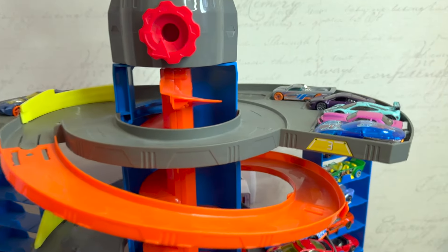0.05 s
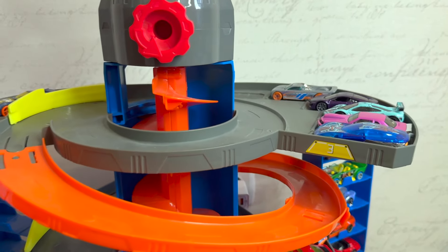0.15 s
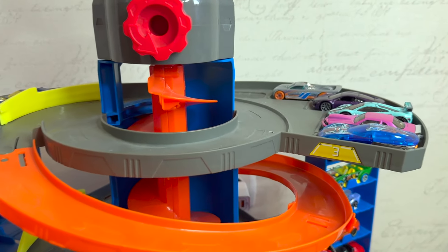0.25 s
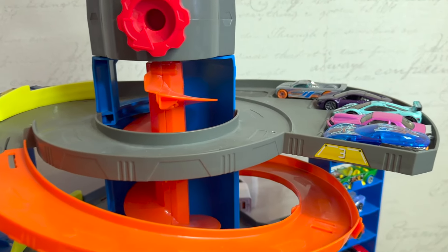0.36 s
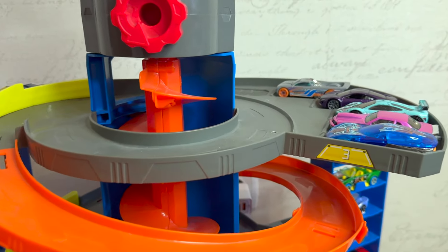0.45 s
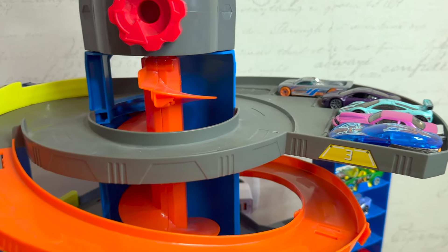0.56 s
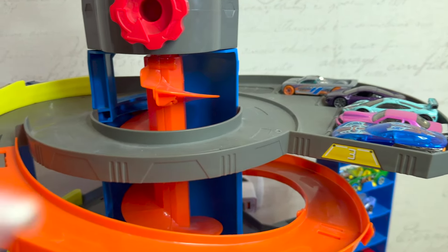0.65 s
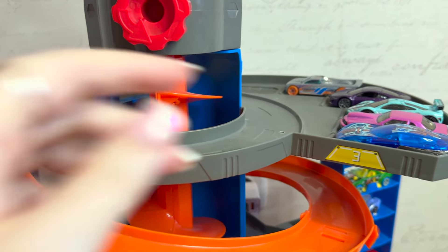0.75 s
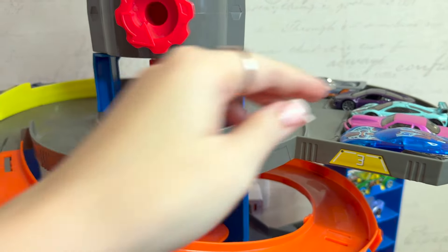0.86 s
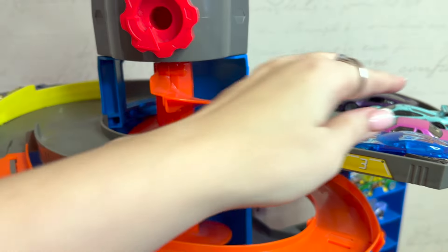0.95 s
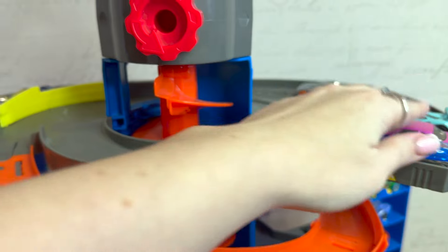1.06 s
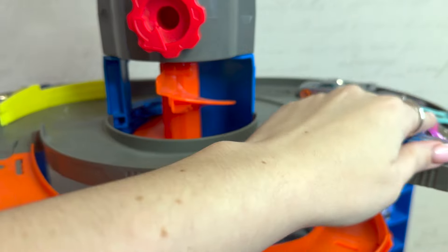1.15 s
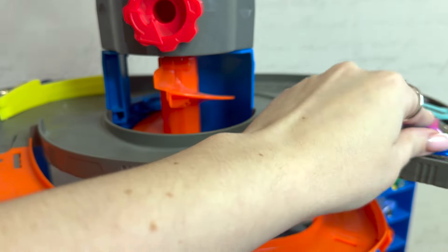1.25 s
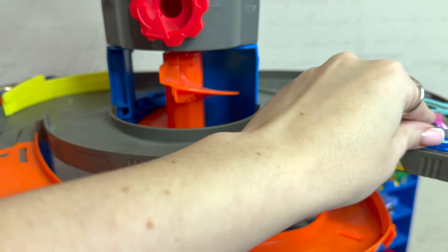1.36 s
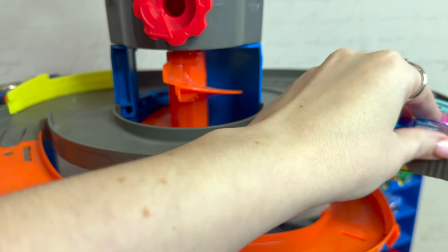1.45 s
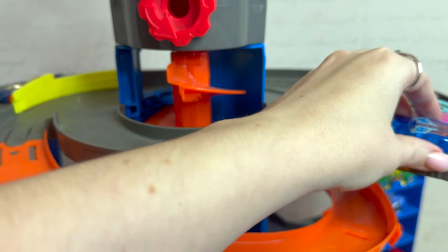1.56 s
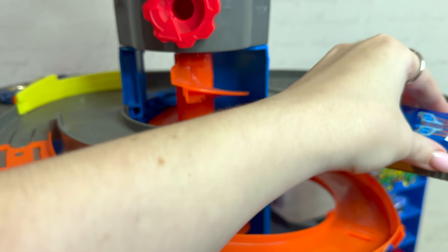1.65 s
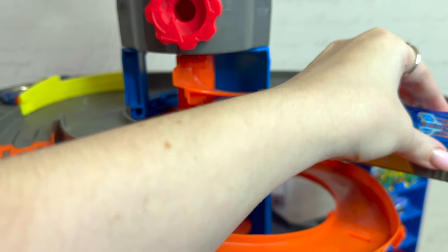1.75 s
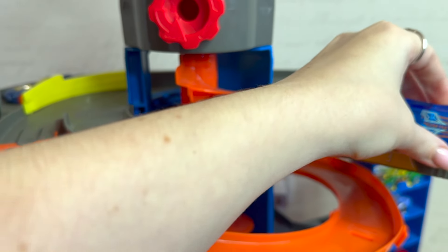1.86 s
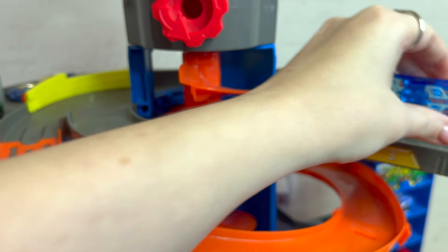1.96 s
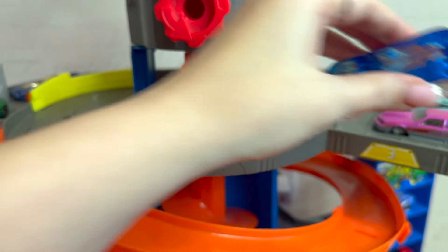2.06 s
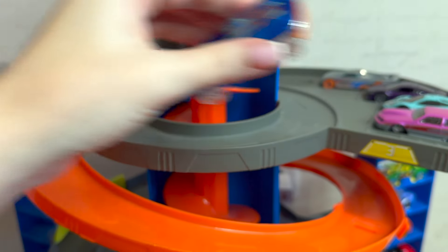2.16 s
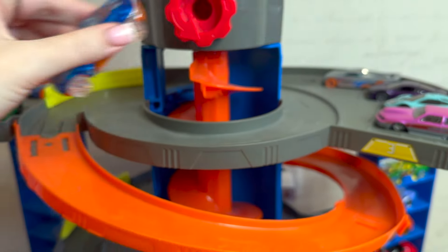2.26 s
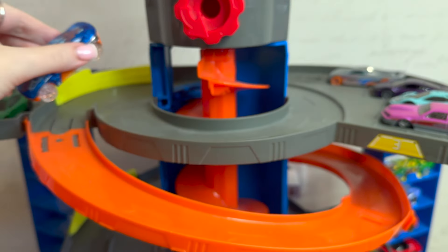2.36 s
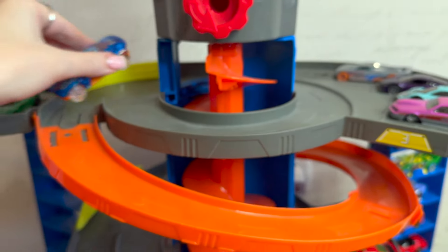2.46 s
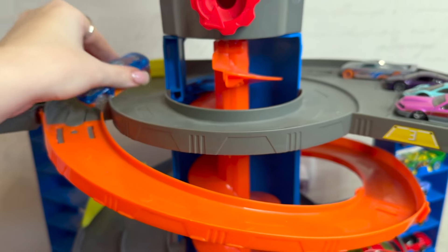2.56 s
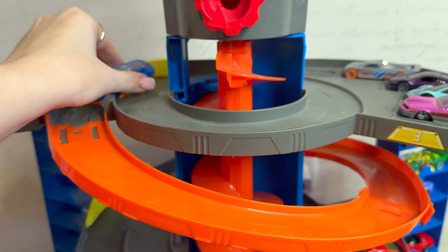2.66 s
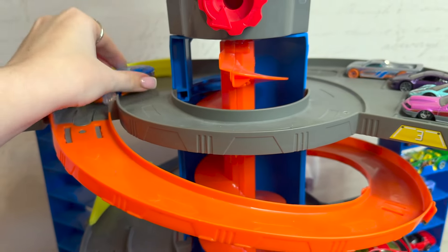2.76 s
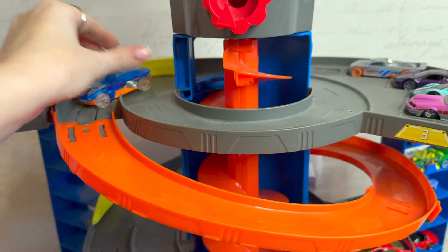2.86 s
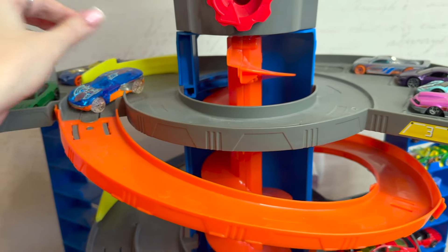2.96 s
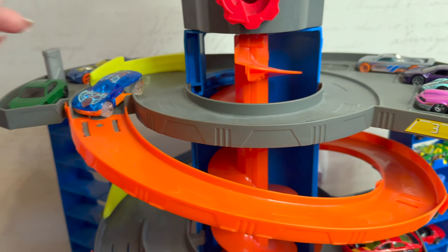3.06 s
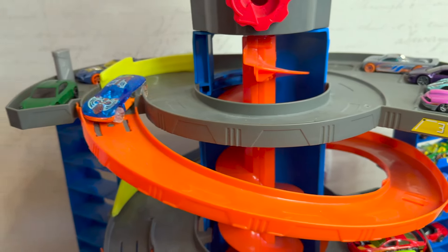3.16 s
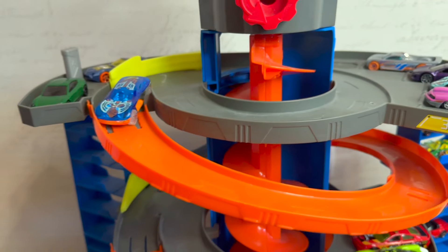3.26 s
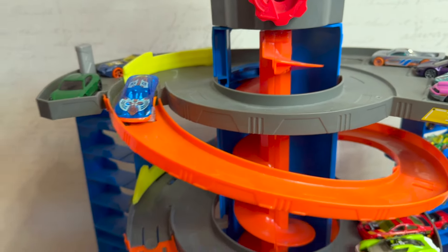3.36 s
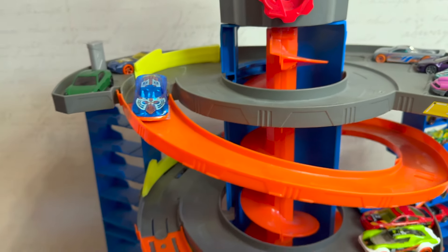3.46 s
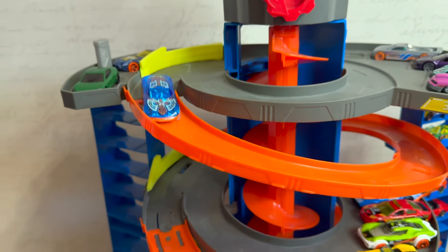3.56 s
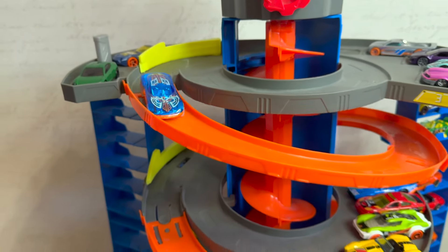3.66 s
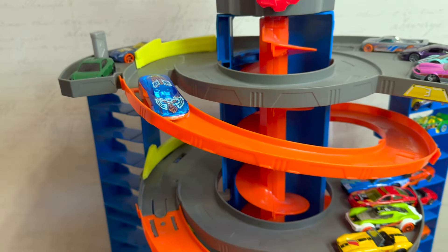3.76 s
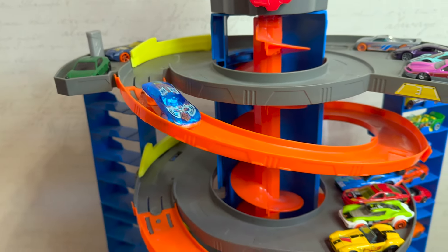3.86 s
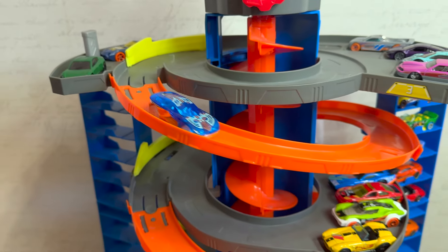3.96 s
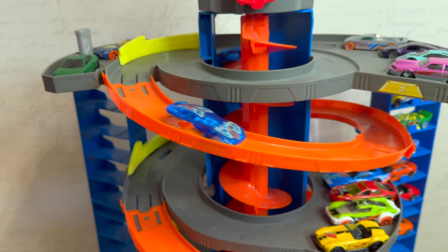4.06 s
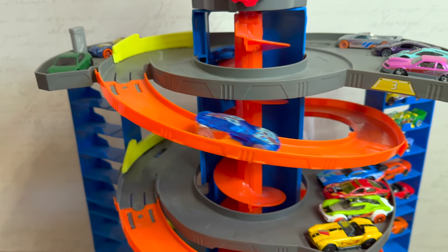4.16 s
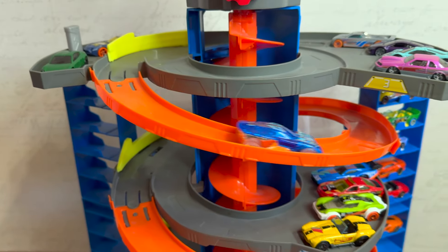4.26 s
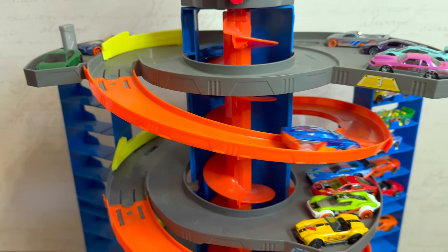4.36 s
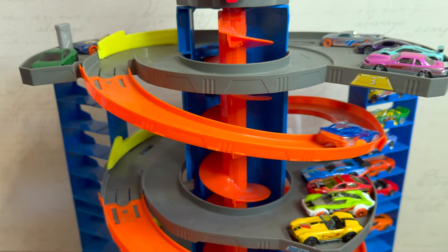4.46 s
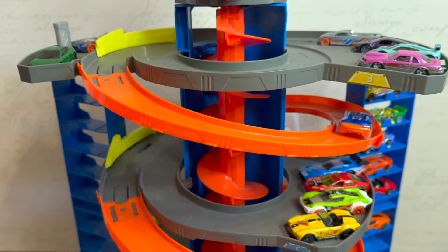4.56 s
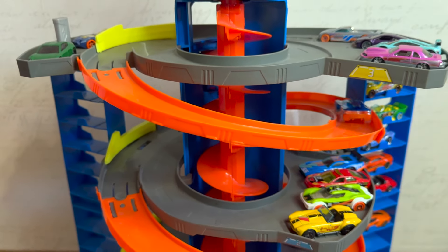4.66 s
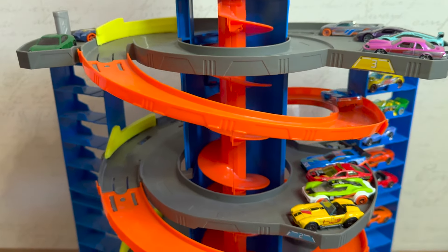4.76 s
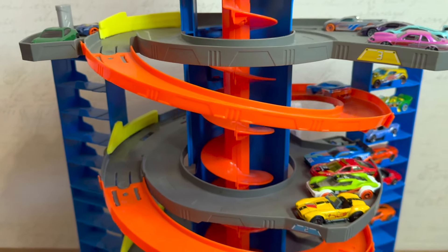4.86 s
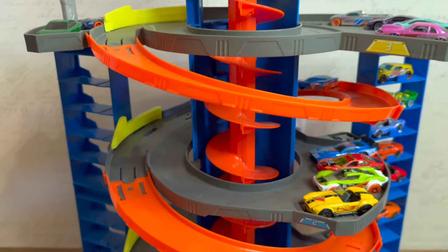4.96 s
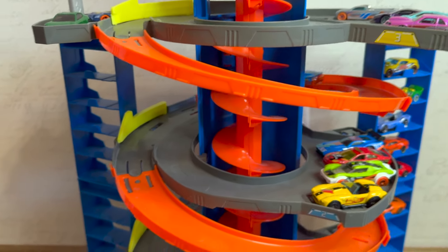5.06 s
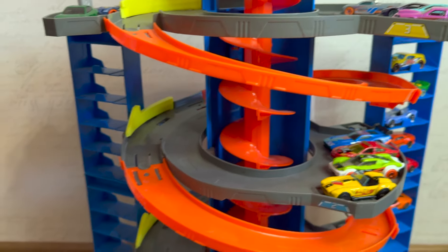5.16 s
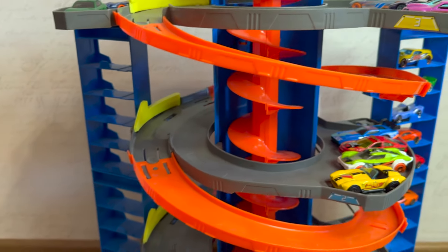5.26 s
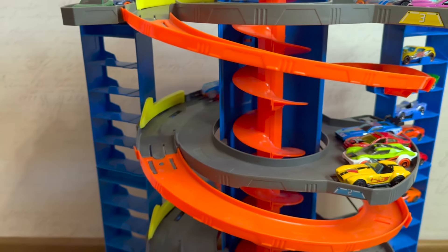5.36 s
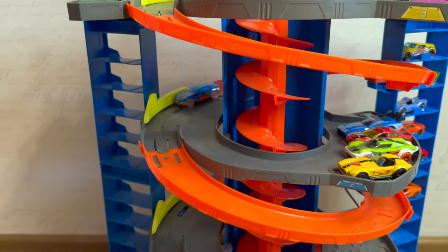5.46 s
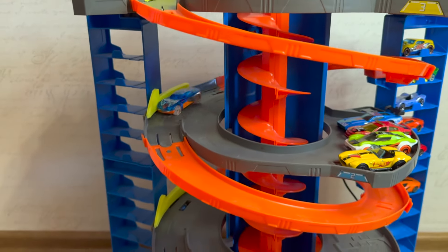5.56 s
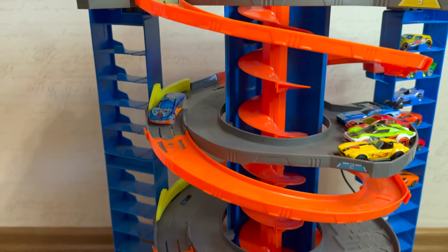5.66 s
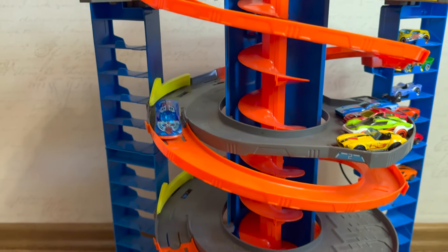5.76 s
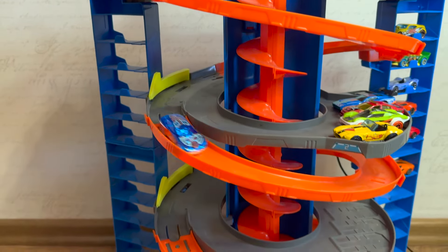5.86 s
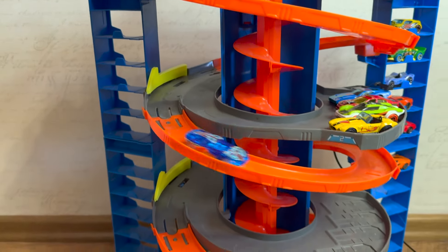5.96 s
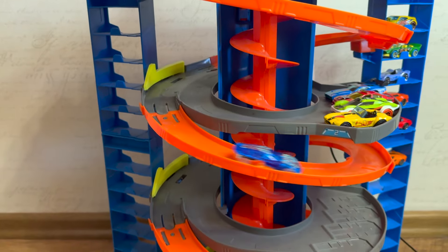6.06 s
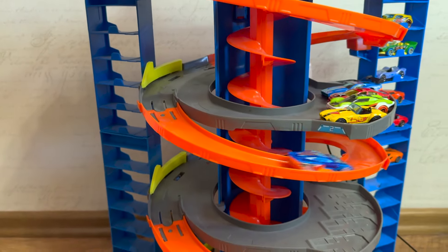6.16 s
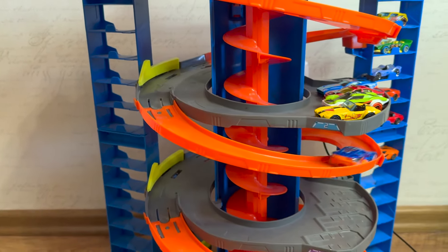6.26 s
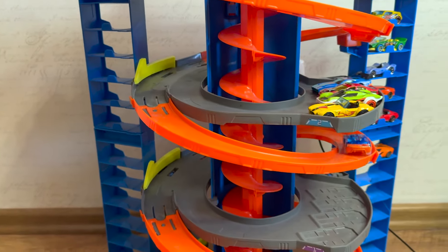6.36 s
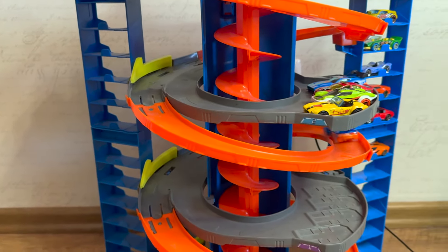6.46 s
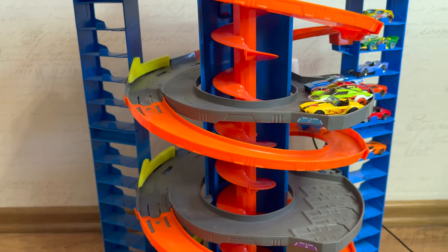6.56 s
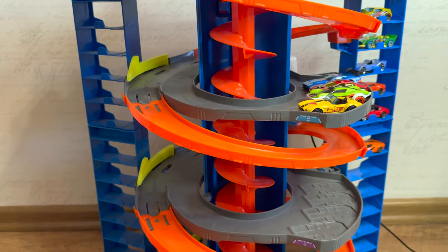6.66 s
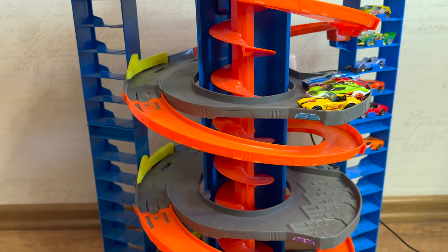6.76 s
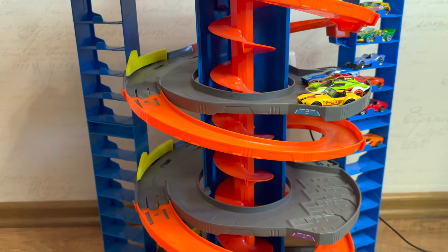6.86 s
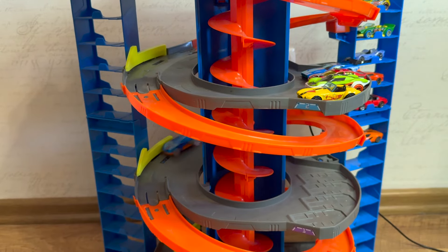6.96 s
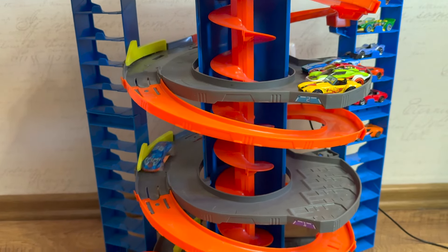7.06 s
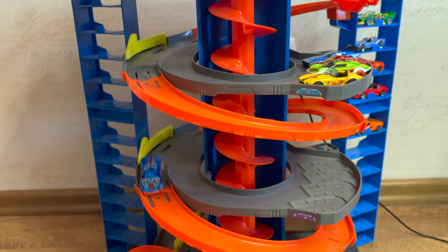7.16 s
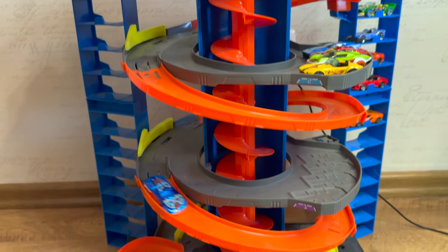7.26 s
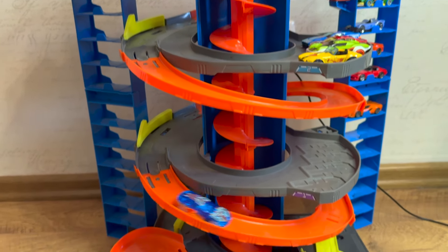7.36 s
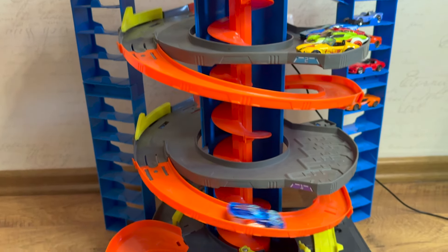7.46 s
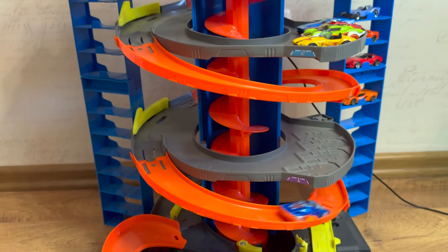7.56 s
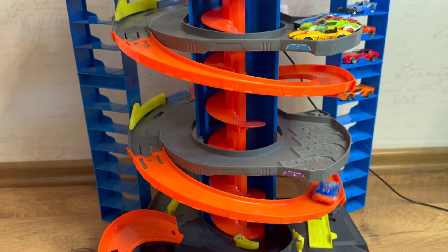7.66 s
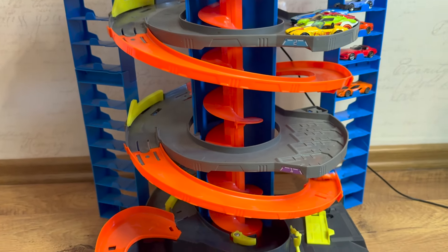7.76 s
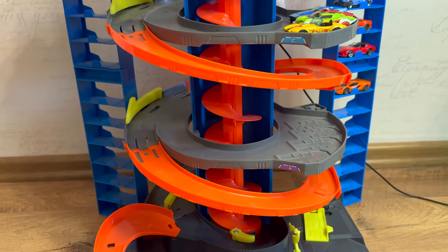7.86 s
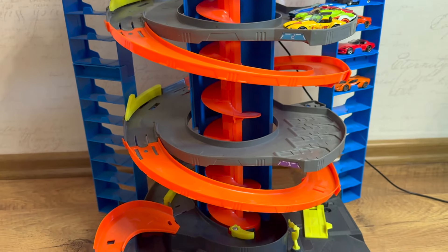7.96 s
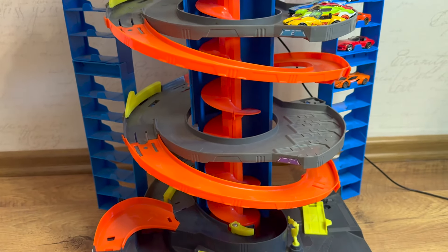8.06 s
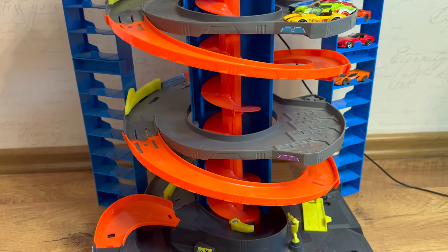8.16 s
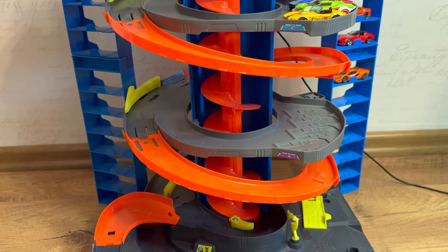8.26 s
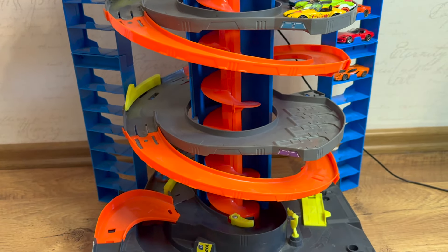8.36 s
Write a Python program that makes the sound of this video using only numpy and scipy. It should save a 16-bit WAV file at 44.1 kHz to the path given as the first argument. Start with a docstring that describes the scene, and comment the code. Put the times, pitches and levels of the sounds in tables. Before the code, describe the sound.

A small metal toy car is clinked loose, dragged and placed on a plastic toy tower with several hard clacks. After near quiet it starts rolling, its wheels making a grainy mid-high rattle over hollow ramps, with bursts of clatter at the turns and joints. A low hum swells once midway. Heard close in a small room with soft rumble and faint hiss.

```python
"""Faint ticks in a quiet, rumbling room; a hand then knocks and drags a small metal toy car off a plastic tower.
Set down, it rolls down a spiral ramp with rough wheels and further knocks, while a low hum swells once.
Contact noise excites resonant modes of five bodies: chassis, hollow ramp, stiffer decks, thin axles and shell;
clinks are decaying sines, the room is filtered noise, and its echo is made of sparse decaying taps.
All is heard close by through a pair of microphone ports."""
import sys
import numpy as np
from scipy import signal
from scipy.fft import rfft, irfft, next_fast_len
from scipy.io import wavfile
from scipy.ndimage import map_coordinates

SR = 44100
rng = np.random.default_rng(int(sys.argv[2]) if len(sys.argv) > 2 else 0)


def invert_db(x):
    """Field ratio 10**(x/20) for x, a level in decibels (scalar or array-like)."""
    u = np.asarray(x, float) / 20
    return 10 ** u


def wav_record(signal):
    """Record a signal, one row per channel, as 16-bit PCM in the file named by sys.argv[1]."""
    frames = np.transpose(np.atleast_2d(signal))
    bounded = np.clip(frames, -1, 1)
    # unit amplitude maps onto the largest positive 16-bit level
    quanta = np.round(bounded * 32767).astype(np.int16)
    wavfile.write(sys.argv[1], SR, quanta)


N = 370881

# Tables of one value a body follow the order chassis, ramp, deck, axles, shell.
# the car on the ramp; it booms most between supports:
# (time [s], rolling level [dB], boom of the span under the wheels [dB])
ROLL = [(3.3, -59, 17.5), (3.55, -62, 6.5), (3.73, -55, 2.5), (3.9, -48.5, -1), (4.05, -44, -2),
        (4.2, -42, -2), (4.42, -38, -2), (4.57, -40.5, -3), (4.67, -48.5, -3.5), (4.85, -45, -5),
        (5.0, -46.5, 0), (5.13, -41.5, -1.5), (5.33, -41, 3), (5.51, -39, -5), (5.66, -43, -5),
        (5.85, -39.5, -2.5), (6.0, -39, -8), (6.09, -37, -1), (6.17, -35, -6.5), (6.27, -36.5, -3),
        (6.4, -43, 0), (6.63, -42, 3), (6.86, -38, 2), (7.09, -37.5, -5.5), (7.2, -43.5, 4.5),
        (7.35, -38, -5), (7.5, -32.5, -5.5), (7.6, -31.5, -1.5), (7.67, -33, 0), (7.73, -40, 1.5),
        (7.95, -41.5, -6.5), (8.11, -40, 1), (8.27, -39, 2.5), (8.41, -34, -2)]
# the car turns round the spiral:
# (time [s], pitch the chassis ring leans towards [Hz], chassis level [dB], shell and axle level [dB])
FACING = [(3.6, 2070, -3.5, -2), (3.78, 2080, 2, 3), (3.95, 2030, 1.5, 0.5), (4.25, 2130, 2.5, -0.5),
          (4.67, 2140, -2, 9), (4.74, 1840, 4.5, 10), (4.82, 2300, -1, 5), (4.86, 1850, -2.5, 5),
          (4.94, 2220, 2, -5), (5.08, 2170, 2.5, -1), (5.27, 2250, 1.5, -0.5), (5.38, 2470, 0, -0.5),
          (5.5, 2050, 0, 4.5), (5.74, 2380, 0, 4), (5.95, 2320, 2, 4.5), (6.12, 2170, 1.5, -2),
          (6.36, 1980, 0, 3.5), (6.41, 2190, 1, 5.5), (6.55, 2310, 1.5, 3), (6.75, 2200, -0.5, 1),
          (7.0, 2230, -1, 4.5), (7.07, 1720, -3, 4.5), (7.31, 2320, 1, 2.5), (7.67, 1830, -1.5, 2.5),
          (7.78, 2130, -3, 3.5), (7.85, 1810, 4, 6.5), (7.99, 1870, -1, 0.5), (8.21, 1900, 4, -1.5),
          (8.26, 2410, 1.5, 3), (8.41, 1800, 0, 3)]
# chassis modes: (frequency [Hz], width [Hz], relative level [dB])
CAR = [(1700, 140, 3), (2190, 120, 12), (2274, 780, 3.5), (2750, 2100, -0.5)]


def evened(x):
    """Normalization to unit root-mean-square level."""
    return x / np.sqrt(np.mean(x ** 2) + 1e-20)


def read(points, hz):
    """Interpolation of a spectrum table, linear in log frequency, at the frequencies hz."""
    f, value = np.transpose(points)
    return np.interp(np.log(hz + 1), np.log(f + 1), value)


def curves(rows):
    """Linear interpolation in time: every column of a table as one value a sample."""
    s, *columns = np.transpose(rows)
    return [np.interp(np.arange(N) / SR, s, c) for c in columns]


def wander(per_s):
    """Band-limited random fluctuation: smooth chance that changes about per_s times a second."""
    steps = rng.standard_normal(1000)
    at = np.arange(0, N + 64, 64)
    return np.interp(np.arange(N), at, map_coordinates(steps, [at / SR * per_s], order=3))


def air():
    """Random noise: lumpy rumble of changing level below, smooth steady hiss above, two faint tones."""
    # spectrum, its shape only within each of the three parts below: (frequency [Hz], density [dB per Hz])
    spectrum = [(15, -55), (25, -55), (59, -10), (112, -18), (131, -5.5), (202, 3), (237, -12.5),
                (621, -27), (903, -30), (1760, -34.5), (3540, -42), (6040, -40.5), (15000, -46.5)]
    # correlation of the two ports: (frequency [Hz], likeness [-1 to 1])
    likeness = [(60, 0.96), (240, 0.68), (950, -0.19), (3770, -0.079), (15000, -0.22)]
    # rumble of room and tower: (time [s], level [dB])
    rumble = [(0.0, -53), (0.96, -56), (1.36, -49), (2.36, -52), (2.81, -49), (6.6, -48), (8.06, -51.5),
              (8.41, -47)]
    # tones of slightly wandering level: (frequency [Hz], mean amplitude [dB])
    tones = [(2820, -85), (5120, -88)]
    hiss_db = -65
    deep_db, deep_share = -57.5, 0.46  # below 115 Hz: level at a rumble of -55 dB, share of its changes

    frames, hz = N // 512 + 5, np.fft.rfftfreq(2048, 1 / SR)
    a, b, c, d = rng.standard_normal((frames, 1025, 4)).T
    same = np.clip(read(likeness, hz), -1, 1)[:, None]
    left = a + 1j * b
    right = same * left + np.sqrt(1 - same ** 2) * (c + 1j * d)
    z = np.array([left, right]) * invert_db(read(spectrum, hz))[:, None]

    parts = [(hz > 30) & (hz < 115), (hz >= 115) & (hz < 270), hz >= 270]
    deep, low, hiss = (
        evened(signal.istft(z * p[:, None], nperseg=2048, noverlap=1536)[1][:, :N]) for p in parts)
    rumble_db, = curves(rumble)
    deep_level = invert_db(deep_db + deep_share * (rumble_db + 55.0) + 0.45 * wander(3.23))
    low_level = invert_db(rumble_db + 0.26 * wander(13.0))
    t = np.arange(N) / SR
    whines = sum(invert_db(db + 1.0 * wander(6.1)) * np.sin(2 * np.pi * f * t) for f, db in tones)
    return deep_level * deep + low_level * low + invert_db(hiss_db) * hiss + whines


def hum():
    """Amplitude and frequency modulation: a low tone swells once, slightly unsteady in both."""
    # the swell: (start [s], end [s], mean frequency [Hz], mean level at its height [dB])
    start, end, hz, db = (4.5, 6, 72.5, -47.5)
    t = np.arange(N) / SR
    swell = np.sin(np.pi * np.clip((t - start) / (end - start), 0, 1))
    phase = 2 * np.pi * np.cumsum(hz + 4.85 * wander(12.0)) / SR
    return invert_db(db + 3 * wander(15)) * swell * np.sin(phase)


def tail():
    """Reverberant decay: sparse taps of random sign, each band dying at its own speed."""
    # reverberation time: (frequency [Hz], decay by 60 dB [s])
    decay = [(300, 0.34), (1000, 0.27), (4000, 0.26), (12000, 0.14)]
    # what the ports share of the echo: (frequency [Hz], likeness [0 to 1])
    likeness = [(200, 1), (600, 0.7), (1500, 0.57), (4000, 0.32), (7500, 0.26), (12500, 1)]
    taps = np.zeros((2, SR // 2))
    slots = np.arange(200, SR // 2 - 20, 20)
    at = slots + rng.integers(0, 20, (2, len(slots)))
    np.put_along_axis(taps, at, rng.choice([-1., 1.], at.shape), 1)
    hz, t, (a, b) = signal.stft(taps, SR, nperseg=256)
    same = np.clip(read(likeness, hz), 0, 1)[:, None]
    z = np.array([a, same * a + np.sqrt(1 - same ** 2) * b])
    fade = invert_db(-60 * t / np.maximum(read(decay, hz), .03)[:, None])
    echo = signal.istft(z * fade, SR, nperseg=256)[1]
    return echo / np.linalg.norm(echo[0])


def room(x):
    """Convolution: three random tails take turns at a fixed pace, so the echo's colour keeps changing."""
    turn = 2 * np.pi * 4 * np.arange(N) / SR
    shares = [np.sqrt(2 / 3) * np.cos(turn + k * np.pi / 3) for k in range(3)]  # squares add up to 1
    return sum(signal.fftconvolve(x[:1] * share, tail(), axes=1)[:, :N] for share in shares)


def ports(x):
    """Phase and level difference: the housing turns the phase between the ports and tilts their balance."""
    # (frequency [Hz], phase by which left leads [rad])
    lead = [(0, 0), (950, 0.4), (1640, -0.5), (2580, 0.7), (3450, 1.6), (4390, 0.4), (5510, 3.4),
            (6290, 5.9), (7750, 9.6), (10500, 8.7), (11900, 9.1), (13900, 7.2), (15800, 6.3), (16400, 7.2)]
    # (frequency [Hz], left over right [dB])
    balance = [(500, .3), (1300, -.5), (4400, -2), (8100, .3)]
    size = next_fast_len(N + 4096)
    hz = np.fft.rfftfreq(size, 1 / SR)
    turn = invert_db(read(balance, hz) / 2) * np.exp(.5j * read(lead, hz))  # half to either port
    return irfft(rfft(x, size) * np.array([turn, 1 / turn]), size)[:, :N]


def ticks():
    """Damped oscillation: tiny dry clicks, each a few cycles."""
    # faint ticks in the quiet: (time [s], level [dB], frequency [Hz])
    events = [(0.1208, -69, 8200), (0.148, -38, 8200), (0.315, -62, 7000), (0.438, -66, 7000),
              (0.4455, -37, 4530), (0.493, -38, 6200)]
    ring_ms = 0.35  # time constant
    t, out = np.arange(200) / SR, np.zeros(N)
    for s, db, hz in events:
        click = np.exp(-t * 1000 / ring_ms) * np.sin(2 * np.pi * hz * t)
        out[round(s * SR):][:200] += invert_db(db) * click
    return out


def clinks():
    """Modal excitation by impact: each clink wakes the car's clear modes near its own pitch."""
    # clear modes of the car with its loose wheels: (frequency [Hz], decay by 60 dB [s])
    loose = [(470, .05), (580, .045), (720, .04), (1030, .045), (1200, .045), (1700, .045), (2130, .04),
             (2350, .04), (2560, .035), (3320, .035), (3630, .045), (3970, .03), (4400, .045), (5100, .03),
             (5540, .03), (6200, .025)]
    # clinks: (time [s], level before scatter [dB], centre frequency [Hz], spread [octaves])
    placed = [(1.112, -24, 1880, .6), (1.203, -20.5, 1790, 0.17), (1.205, -26.5, 4400, 0.13),
              (1.346, -32, 800, 0.37), (1.358, -37, 600, .3), (1.399, -39, 3900, 0.16),
              (1.401, -34, 1900, .3), (1.5395, -30, 3860, 0.21), (1.568, -51, 3580, .5),
              (1.6105, -30.5, 2000, .35), (1.627, -30, 2110, 0.54), (1.655, -47, 2000, .3),
              (1.6745, -40, 1970, .3), (1.694, -42, 2080, .3), (1.751, -35, 1970, 0.28),
              (1.753, -51, 4400, .15), (1.8655, -27, 3030, 0.36), (1.868, -33, 1030, 0.13),
              (1.889, -33, 3000, 0.27), (2.061, -46, 2010, 0.42), (2.121, -55, 1900, .25),
              (2.144, -63, 1900, .25), (2.157, -56, 1960, 0.33), (2.285, -58, 3000, 0.48),
              (2.311, -62, 2400, .2), (2.376, -62, 1800, .3), (2.405, -60, 2200, .4),
              (2.479, -54, 2130, .4), (2.504, -52, 2400, 0.27), (2.567, -30, 3300, 0.45),
              (2.598, -24, 1160, .2), (2.6, -30, 580, 0.12), (2.633, -35, 3580, 0.34),
              (2.695, -34, 1900, .2), (2.764, -27, 2110, 0.22), (2.765, -20, 3920, 0.12),
              (2.766, -20, 1200, 0.31), (2.846, -33, 1100, .2), (2.912, -16.5, 540, 0.28),
              (2.927, -40, 604, 0.33), (3.168, -37, 1100, 0.34), (3.998, -25, 2280, 0.69),
              (4.245, -26, 2300, .15), (4.36, -27, 2110, .3), (4.466, -20, 2200, 0.38),
              (4.503, -29, 1050, .3), (4.596, -22, 4650, 0.15), (5.84, -26, 605, 0.21),
              (5.985, -21, 2150, 0.11), (6.015, -22, 2270, .15), (6.13, -32, 2200, .3),
              (6.245, -32, 3300, .2), (6.32, -25.5, 476, .2), (7.383, -28, 2200, 0.17),
              (7.419, -30, 4400, 0.083), (7.437, -30.5, 2300, .3), (7.465, -22, 2000, 0.24),
              (7.509, -26.5, 2560, .15), (7.542, -23, 2500, .5), (7.194, -28, 6200, .15),
              (8.246, -26, 700, .4), (8.271, -24, 650, .4), (8.283, -26, 550, 0.34)]
    rise_ms, scatter_db = 2.5, 2
    # the rolling car also clinks at random; least level is over the rolling level
    jiggles_per_s, jiggle_db, jiggle_spread_db = 70, 4, 1.8
    jiggle_hz, jiggle_octaves, jiggle_reach = 2100, .55, .4  # middle, scatter / 2, spread of each [octaves]

    chance = rng.random((500, 3))
    when = ROLL[1][0] - np.cumsum(np.log(1 - chance[:, 0])) / jiggles_per_s
    roll_db = np.interp(when, *np.transpose(ROLL)[:2])
    strength_db = roll_db + jiggle_db - jiggle_spread_db * np.log(1 - chance[:, 1])
    pitch = jiggle_hz * 2 ** (jiggle_octaves * (4 * chance[:, 2] - 2))
    jiggles = np.c_[when, strength_db, pitch, jiggle_reach + 0 * when]
    s, db, centre_hz, octaves = np.vstack([placed, jiggles[when < N / SR - .01]]).T

    luck = rng.standard_normal((600, len(loose), 2))[:len(s)]
    distance = np.log2(np.array(loose)[:, 0] / centre_hz[:, None]) / octaves[:, None]
    near = np.exp(-.5 * distance ** 2)
    share = near / np.linalg.norm(near, axis=1)[:, None]
    share = share * invert_db(db[:, None] + scatter_db * luck[..., 0]) * np.sign(luck[..., 1])
    t, out = np.arange(4096) / SR, 0
    for (hz, t60), strength in zip(loose, share.T):
        hits = np.bincount((s * SR).astype(int), strength, N)
        envelope = invert_db(-60 * t / t60) * (1 - np.exp(-t * 1000 / rise_ms))
        out = out + signal.oaconvolve(hits, envelope * np.sin(2 * np.pi * hz * t))[:N]
    return out


def ring(drive, modes, shift_db, shift_per_s, bend=1):
    """Modal resonance: the moving point of contact shifts energy between modes and bends their pitch."""
    glide = 0.02  # share by which each pitch wanders
    gains = invert_db([db + shift_db * wander(shift_per_s) for _, _, db in modes])
    widths = np.array([width for _, width, _ in modes])[:, None]
    gains = gains / np.sqrt((gains ** 2 * widths).sum(0))
    side = rng.choice([-1, 1], N)  # each bump lands on one side or the other of a mode's node lines
    out = 0
    for k, (hz, width, _) in enumerate(modes):
        r = np.exp(-1.4 * np.pi * width / SR)
        turn = np.exp(2j * np.pi * np.cumsum(hz * bend * (1 + glide * wander(4))) / SR)
        shifted = drive * (gains[k] * np.roll(side, 999 * k) * turn.conj())  # down to 0 Hz
        # two smoothing steps keep the skirts steep
        smooth = signal.lfilter([(1 - r) ** 2], [1, -2 * r, r * r], shifted + 1e-18)
        out = out + (turn * smooth).real
    return out


def body(drive, *shape):
    """Linear response of one body, scaled so that plain noise would come out at unit level."""
    both = ring(np.array([*drive, rng.standard_normal(N)]), *shape)
    return both[:2] / both[2].std()


def toy(drives, shift_db, shift_per_s, damping, chassis_bend):
    """Superposition of all five resonant bodies, each heard only within its own band."""
    # modes, widths before damping: (frequency [Hz], width [Hz], relative level [dB])
    ramp = [(253.8, 39.5, -1), (346.6, 65, 0), (401, 77, -3), (540, 101, -3.5), (708, 160, -3.5)]
    deck = [(803, 194, 4), (885, 55, 1), (1080, 79, 9), (1270, 143, 6), (1330, 460, 3)]
    axles = [(6230, 440, 14.5), (8200, 1550, 17.5), (10300, 720, 22), (12400, 2200, 7.5), (15200, 1600, 10)]
    shell = [(3320, 2700, 1.5), (3930, 1630, -3), (4560, 680, -1), (5460, 320, -3.5), (6020, 3800, -2)]
    # each body radiates little above this: (frequency [Hz]) a body
    dull_hz = [5960, 2440, 3980, 19700, 9000]
    out = 0
    for drive, modes, top_hz in zip(drives, [CAR, ramp, deck, axles, shell], dull_hz):
        damped = [(hz, width * damping, db) for hz, width, db in modes]
        bend = chassis_bend if modes is CAR else 1
        rung = body(drive, damped, shift_db, shift_per_s, bend)
        band = signal.butter(2, [modes[0][0] / 3, min(top_hz, 21000)], "band", fs=SR)
        out = out + signal.lfilter(*band, rung)
    return out


def paired(a, b):
    """Partial coherence: from two contacts a and b, what each body sends to the left and right port."""
    # how much both ports share: (likeness [0 to 1]) a body
    alike = [0.39, 1, 0.68, 0.83, 0.077]
    same = np.clip(alike, 0, 1)[:, None]
    return np.stack([a + 0 * same, same * a + np.sqrt(1 - same ** 2) * b], 1)


def knocks():
    """Impact excitation: a rough push grinds up to one blow and dies; each body feels its own share."""
    # knocks: (time [s], chassis level [dB], ramp, deck and axles over the chassis [dB each])
    events = [(1.1026, -27.5, -8, -7.5, -6), (1.1126, -27, -13, -21, -2), (1.1689, -35.5, -3.5, -6, -6),
              (1.1795, -31, -3, -15, -12), (1.1865, -41, -14, -13, -8), (1.2, -26, -8, -10, 1.5),
              (1.3408, -46.5, 8.5, 9, -10), (1.357, -42.5, 3.5, 0, 0.5), (1.3977, -26.5, -4, -7, -14),
              (1.4274, -54, 13, -14, -3), (1.445, -52.5, -5, -5, 14), (1.535, -46.5, -7, -29, -5),
              (1.5425, -40, -3.5, -17, -18), (1.5777, -44.5, 2.5, -8, -30), (1.61, -44, 1, -13, -34),
              (1.6281, -40.5, 0.5, 1.5, -21), (1.6734, -44.5, -5, -15, -34), (1.6965, -50.5, 6.5, -2, -23),
              (1.75, -40.5, -2, -24, -20), (1.756, -51, 7.5, -18, -42), (1.8602, -33, -13.5, -21, -19),
              (1.8676, -34, -10, -2.5, -24), (1.889, -39, -9, -8, -32), (2.2845, -57, -20, -23, -25),
              (2.4793, -55, -22, -18, -4), (2.5651, -34, -12.5, -1.5, -13), (2.5954, -30.5, -13.5, -1, 0.5),
              (2.6019, -32, -9, 0, -18), (2.6326, -25, -33, -4.5, 4.5), (2.638, -28.5, -30, 2.5, -21),
              (2.6947, -36.5, -31, -12, -27), (2.7631, -21.5, -11.5, -9, 2.5),
              (2.7719, -22.5, -9.5, -6, -19), (2.7972, -30.5, -9.5, 6, 6.5), (2.8447, -32, -29, -2.5, -7),
              (2.9112, -31.5, -5.5, -2, -1), (2.969, -35, -14, -5, -16), (3.1657, -45, -1.5, 4, 3.5),
              (3.1955, -52, 6, 7, 9), (3.233, -49.5, -1.5, 9, 0), (3.5717, -41, -2.5, 2, -33),
              (3.999, -40, -17, -2, 5.5), (4.2068, -35, -7, -16, -5), (4.36, -28, -17.5, -7, -43),
              (4.4919, -26.5, -11, -3, -5), (4.594, -28, -28, -28, -1), (4.604, -32, -20, -15, -7),
              (4.899, -37, -12.5, -14, -10), (4.909, -39, -11.5, -14, -3), (5.0253, -41, -1, -1, 2),
              (5.036, -44, -1, 1, -15), (5.2981, -34, -16, 3, 6.5), (5.3455, -25, -8, -6, -0.5),
              (5.3671, -43, 4, 10, 11), (5.399, -25.5, -7, -1, 8.5), (5.435, -21, -17, -9, 2.5),
              (5.457, -23.5, -16, -2, 4), (5.4864, -26.5, -6, -2, 1.5), (5.5245, -28.5, -8, -3, 3),
              (5.66, -28, -2, 1, -2), (5.714, -32.5, -2, -13.5, 3), (5.7472, -30.5, -2, 2, 4),
              (5.7617, -27.5, -9, -31, -3.5), (5.77, -35.5, 3.5, -16, 6), (5.839, -32, -0.5, -21.5, -1),
              (5.889, -35.5, -10, -26, -9), (6.099, -38, -0.5, -9, -13), (6.13, -34, -2.5, -4.5, 2),
              (6.3046, -26, -7, -21, 1), (6.312, -26.5, -5.5, -14, -3), (6.3263, -41, 5.5, -14, -11),
              (6.335, -55, -1, -14, -8), (6.3862, -27.5, -25, -15, 3), (6.887, -32.5, 2, -1, -17.5),
              (6.8985, -29, -3, -16.5, -14), (6.908, -26.5, -3, -13, -17), (6.922, -29.5, -2.5, 0, -17),
              (6.95, -19.5, -39, -11, 3.5), (7.1173, -30, -1, -2, -4), (7.163, -38.5, 7.5, 0, -9),
              (7.193, -31.5, -31, 0.5, 8.5), (7.232, -32.5, -5.5, 3, 0), (7.2528, -30.5, 0, -16, -0.5),
              (7.268, -34, -2.5, -15, 5), (7.285, -38, -3, -13, 1), (7.382, -26.5, -22, -18, -28),
              (7.433, -24.5, -26, -15, -33), (7.5077, -29, -7, -16, -11), (7.5415, -29, -21, -11, -28),
              (7.6565, -24.5, -8, -20, 1), (7.726, -23.5, -29.5, -21, 2), (7.85, -29.5, -12, -14.5, -11),
              (7.89, -35.5, 0, -15, -8), (8.041, -28, -4, -13, -22), (8.052, -34, 1.5, -16, -5.5),
              (8.146, -29.5, -3, -21, -12), (8.155, -33, -1.5, -12, -22), (8.2436, -29.5, 2.5, 0, -2.5),
              (8.2516, -34, 1.5, 7, -7), (8.2663, -31, 0.5, -19, -30), (8.276, -28.5, -10, 0, -3.5),
              (8.342, -26.5, -3, -19, -12), (8.3757, -36, -21, -13, -13)]
    # single clean blow against rough grinding: (amplitude ratio) a body
    blow = [0.059, 0.063, 0.083, 0.37, 0.28]
    # softer parts stay in contact longer: (factor on the decay time) a body
    linger = [0.16, 1.9, 0.79, 0.81, 1.42]
    contact_ms, soft_per_db = 4.4, 0.4049  # time at a ramp share of -10 dB; dB of time per dB of share
    tick_ms, tick_below_db = 1.4, -52  # the faintest knocks are brief ticks
    grind_share = 0.4  # time constant of the grind up to the blow, as a share of the contact time

    lead = 400  # samples ahead of the tabled time
    t, out = (np.arange(2400) - lead) / SR, np.zeros((5, 2, N + 2400))
    grit = rng.standard_normal((len(events), 2, 2400))
    for (s, db, ramp_db, deck_db, axle_db), g in zip(events, grit):
        if db < tick_below_db:
            length_ms = tick_ms
        else:
            length_ms = contact_ms * invert_db(soft_per_db * (max(ramp_db, -15) + 10))
        u = t * 1000 / length_ms - .5
        after = u / np.array(linger)[:, None]
        swell = np.where(u < 0, np.exp(u / grind_share), np.exp(-.6 * after - 0.31 * after ** 2))
        push = paired(*g) * swell[:, None]
        push[..., abs(u).argmin()] += (blow * np.linalg.norm(swell, axis=1))[:, None]
        shell_db = 0.5 + 0.22 * axle_db  # a brighter knock stirs the shell more
        level = invert_db(db + np.array([0, ramp_db, deck_db, axle_db, shell_db]))
        at = round(s * SR) - lead
        out[..., at:at + 2400] += level[:, None, None] * push
    return out[..., :N]


def scrapes():
    """Friction envelopes as power: each drag rises, holds and fades."""
    # the car dragged over the deck by hand: (start [s], length [s], level [dB])
    drags = [(1.088, 0.13, -43), (1.232, 0.19, -50.5), (1.497, 0.073, -56.5), (1.81, 0.089, -59),
             (2.664, 0.16, -60), (2.773, 0.25, -51), (2.888, 0.46, -54)]
    rise_s, fall_s = 0.058, 0.018  # fall is the time constant of the amplitude
    t, power = np.arange(N) / SR, 0
    for s, length, db in drags:
        fade = np.exp(-2 * np.maximum(t - s - length, 0) / fall_s)
        power = power + invert_db(2 * db) * np.clip((t - s) / rise_s, 0, 1) * fade
    return power


def contact():
    """Surface roughness as shot noise: tiny bumps under a wheel, a few of them large, over a fine rub."""
    bumps_per_s, bump_spread_db = 900, 2.5
    size = invert_db(bump_spread_db * np.minimum(rng.exponential(1, N), 5)) * rng.choice([-1, 1], N)
    bumps = evened(size * (rng.random(N) < bumps_per_s / SR))
    return evened(bumps + 0.89 * rng.standard_normal(N))


def rolling():
    """Amplitude-modulated roughness: two wheel contacts beat once a turn and chatter unevenly."""
    # once-a-turn beat of an out-of-round wheel, its depth wandering: (strength [dB]) a body
    throb_db = [4.4, 1, 1, 9, 1.8]
    # level over the rolling level: (level [dB]) a body
    roll_share_db = [0, -3, -4.5, -5.5, -4]
    # how much each follows the boom: (share) a body
    boom_share = [0.048, 0.67, 1, 0.63, 0.57]
    # drags over their tabled level: (level [dB]) a body
    scrape_db = [-4, -1.5, -3, -13, -6]
    # faint floor of hiss under everything, coloured by the bodies: (level [dB]) a body
    floor_db = [-84, -78.5, -90.5, -105, -78.5]
    turns_per_s, turns_per_db = 36, 4  # wheel speed at a rolling level of -36.5 dB; louder is faster
    drift_db, let_go_s = 0.8, 0.23  # each body drifts a little on its own; the car is let go gradually

    roll_db, boom_db = curves(ROLL)
    turns = np.cumsum(turns_per_s + turns_per_db * (roll_db + 36.5)) / SR + 0.14 * wander(27)
    depth = 0.55 + 0.35 * wander(7.8)
    beat_db = np.array(throb_db)[:, None] * np.cos(2 * np.pi * turns) * depth
    chatter = invert_db(beat_db + 1.2 * wander(60) + [1.1 * wander(45) for _ in throb_db])

    let_go = np.clip((np.arange(N) / SR - ROLL[0][0]) / let_go_s, 0, 1)
    _, chassis_db, bright_db = curves(FACING)
    facing_db = np.array([chassis_db, 0 * roll_db, 0 * roll_db, bright_db, bright_db])
    drift = [drift_db * wander(6) for _ in roll_share_db]
    rolled_db = facing_db + roll_db + np.c_[roll_share_db] + np.c_[boom_share] * boom_db + drift
    rolled = let_go * invert_db(rolled_db)
    dragged_power = invert_db(np.c_[scrape_db]) ** 2 * scrapes()
    levels = np.sqrt(rolled ** 2 + dragged_power + invert_db(np.c_[floor_db]) ** 2)
    levels = levels * chatter / np.sqrt((chatter ** 2).mean(1))[:, None]
    return levels[:, None] * paired(contact(), contact())


def scene():
    """Superposition: rolling colour drifts as the car moves; knocks press the parts together and damp them."""
    lean = np.sqrt(curves(FACING)[0] / CAR[1][0])  # halfway to the tabled pitch, in octaves
    rolled = toy(rolling(), 2.2, 14, 1, lean)
    blows = knocks()
    # the whole tower thuds with the ramp: a mode at 194 Hz, 73 Hz wide
    thud = invert_db(-12) * body(blows[1], [(194, 73, 0)], 0, 1)
    knocked = toy(blows, 3.1, 40, 1.89, 0.93) + thud + ticks() + clinks()
    near = rolled + knocked
    return ports(near + invert_db(-7.0) * room(near)) + air() + hum()


def band_limit(x):
    """A steep low-pass at the top of the band."""
    return signal.sosfilt(signal.butter(12, 16810, fs=SR, output="sos"), x)


def record(dry):
    """Low-pass filtering: the microphone's band limit at 15.9 kHz."""
    heard = signal.sosfilt(signal.butter(10, 15900, fs=SR, output="sos"), dry)
    return band_limit(heard)


dry = scene()
out = record(dry)
wav_record(out)
```